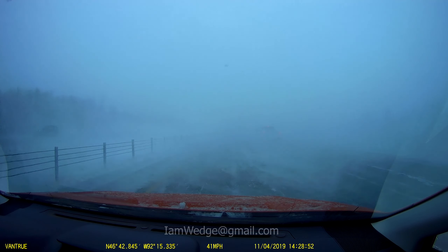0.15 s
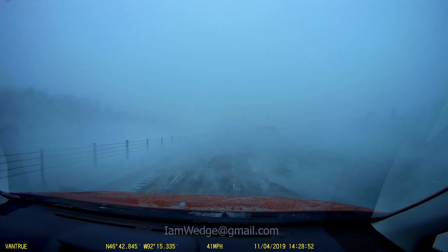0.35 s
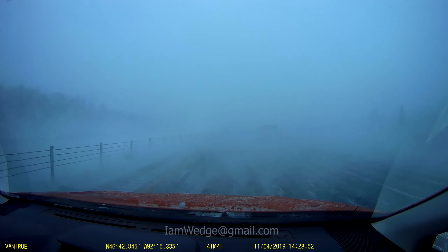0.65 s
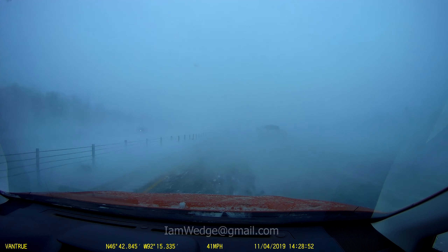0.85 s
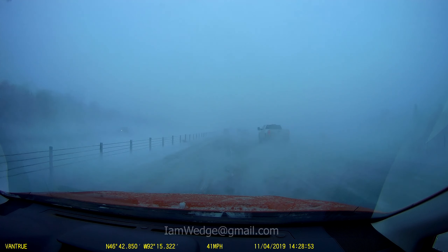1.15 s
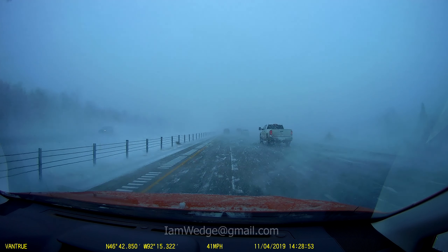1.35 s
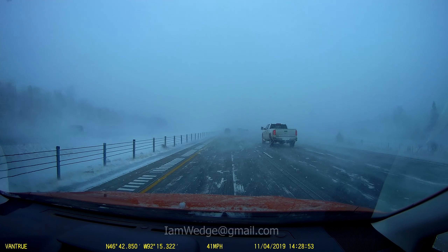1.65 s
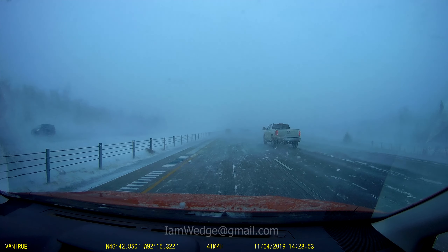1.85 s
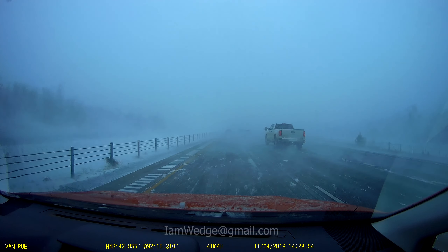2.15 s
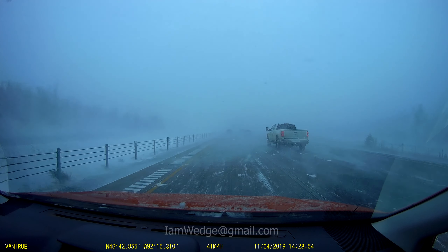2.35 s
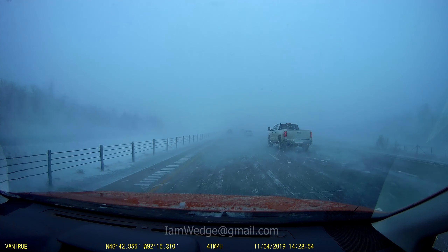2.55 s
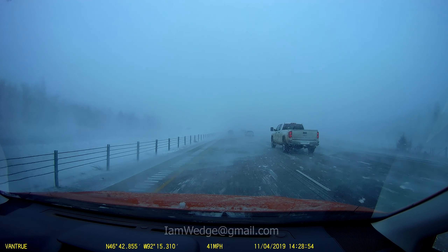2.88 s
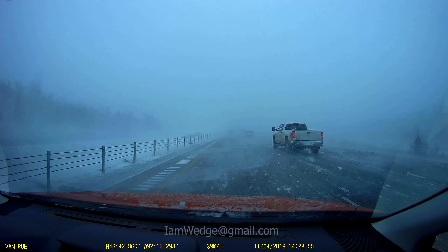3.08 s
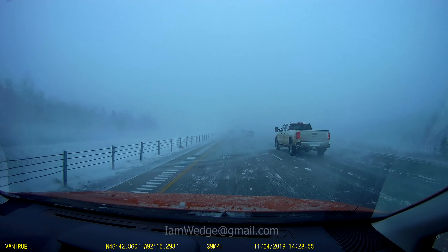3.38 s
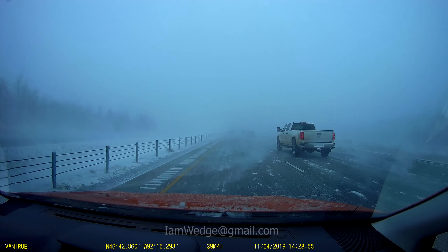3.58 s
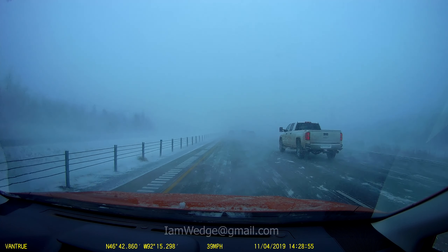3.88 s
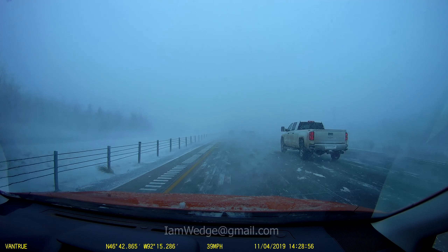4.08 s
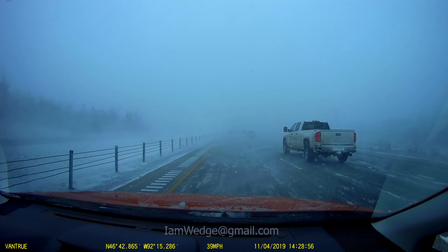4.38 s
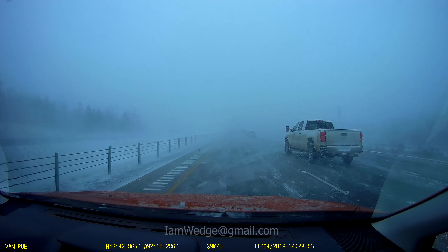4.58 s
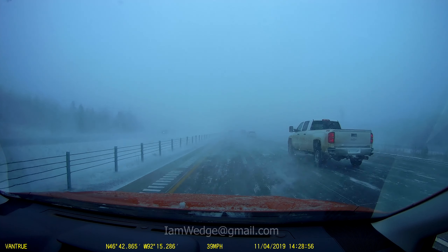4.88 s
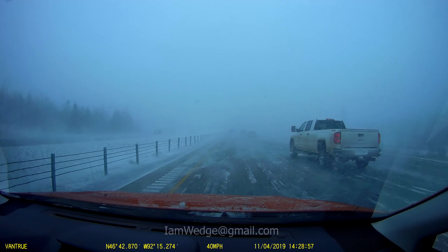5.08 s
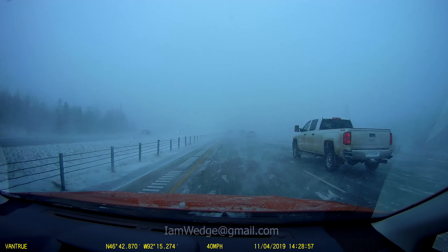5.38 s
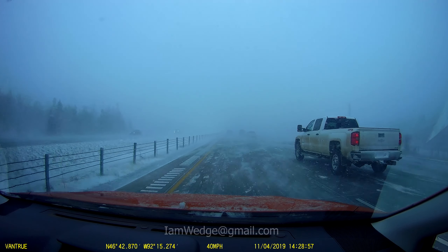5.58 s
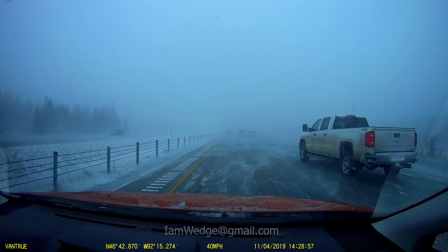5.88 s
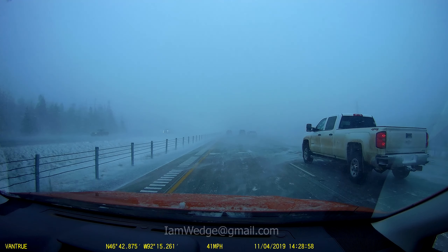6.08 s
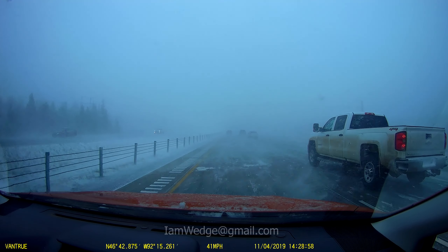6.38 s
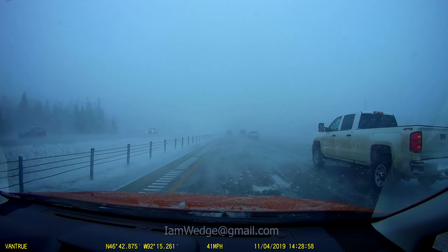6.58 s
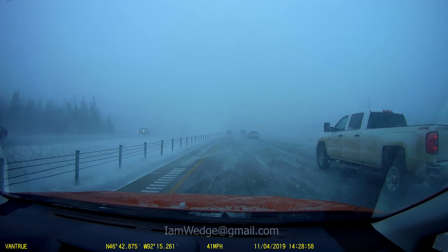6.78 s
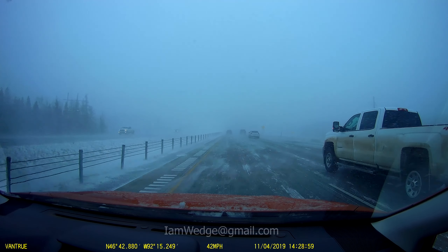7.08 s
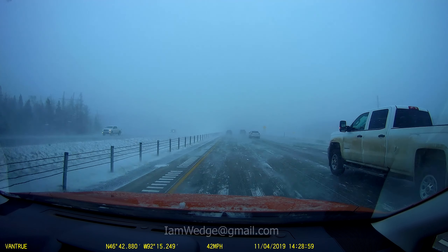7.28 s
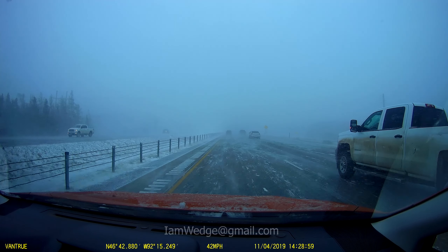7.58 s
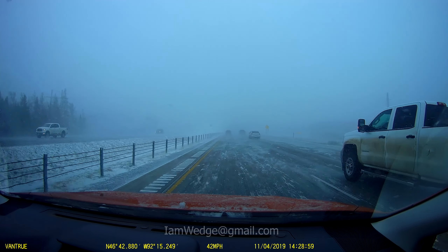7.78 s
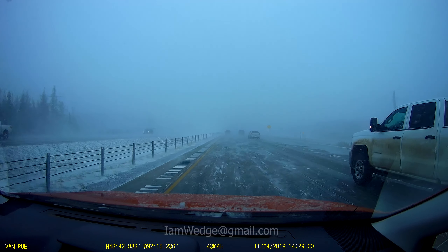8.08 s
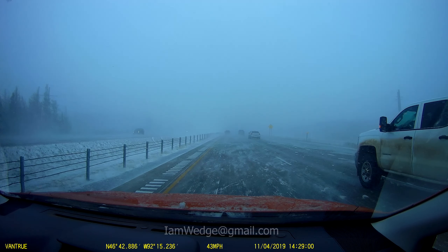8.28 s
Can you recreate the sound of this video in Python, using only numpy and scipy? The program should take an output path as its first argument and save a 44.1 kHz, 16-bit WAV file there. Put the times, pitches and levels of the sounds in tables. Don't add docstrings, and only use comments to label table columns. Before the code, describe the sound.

Inside a car driving a snowy highway in a storm, wind pours through a slightly open window, roaring and fluttering, with low cabin booms and shuddering panels. Tyres drone below. A hazard relay alternates sharp tick and softer tock about three times a second. Early gusts are strongest, bringing brief thin whistles and dull seal cracks; later the wind eases somewhat. One small windscreen microphone hears it close and boxy, with slightly patchy treble.

```python
import sys
import numpy as np
from scipy import signal
from scipy.fft import rfft, irfft, next_fast_len
from scipy.io import wavfile
from scipy.ndimage import uniform_filter1d, minimum_filter1d, map_coordinates

SR = 44100
rng = np.random.default_rng(int(sys.argv[2]) if len(sys.argv) > 2 else 0)


def ratio(d):
    e = np.asarray(d, float) / 20
    return 10 ** e


def master(y):
    cut = np.clip(np.atleast_2d(y).T, -1, 1)
    pcm = np.round(cut * 32767)
    wavfile.write(sys.argv[1], SR, pcm.astype(np.int16))


N = 372204

# (frequency [Hz], density [dB per Hz])
BUFFET_SPECTRUM = [(8, -26), (22, -5.5), (32, -4.5), (48, -8.5), (70, -3), (95, -9.5), (140, -20.5),
                   (300, -73)]
ROAR_SPECTRUM = [(110, -45), (200, -18), (270, -16), (320, -6), (400, -7), (600, -10.5), (800, -25.5),
                 (1200, -62), (3000, -90)]
RUSH_SPECTRUM = [(300, -39), (550, -13), (800, 0.5), (1100, -3.5), (1500, -8.5), (2000, -10), (2500, -19),
                 (3500, -38), (7000, -70)]
HISS_SPECTRUM = [(1200, -38), (2000, -4), (2700, -1.5), (3500, -3), (5000, -8.5), (7000, -11.5),
                 (10000, -15), (13000, -17), (15700, -22)]
# (time [s], level [dB])
WIND_STRENGTH = [(0, -35), (.17, -35), (.37, -31.5), (.63, -36.5), (.8, -33), (1.13, -34.5), (1.38, -26.5),
                 (1.6, -30.5), (2.16, -36), (2.4, -34), (3.1, -37.5), (3.75, -39), (4.1, -36.5), (5.3, -40),
                 (6.45, -39), (6.85, -38), (7.3, -35), (7.8, -40.5)]
# (time [s], level [dB], length [s], brightness [dB])
PUFFS = [(0.186, -3, .06, -2), (0.236, 0.5, 0.035, 3), (0.502, 5, 0.095, 2.5), (0.805, 2, 0.056, -0.5),
         (0.92, 4, 0.037, 0), (1.324, 3.5, 0.051, 1), (1.446, 4, 0.037, -1.5), (1.697, 1.5, .05, 2.5),
         (2.27, 4.5, 0.14, 2), (2.47, -0.5, .05, 3.5), (2.8, 0.7, 0.53, 1.5), (2.982, 0.5, 0.054, 1.5),
         (3.117, -2, 0.1, -1), (3.358, 4.5, 0.1, 1), (3.535, 2.5, 0.1, 1.5), (3.878, 3, 0.13, 2),
         (4.275, 2.5, 0.11, 2), (4.6, -0.5, 0.17, 2.5), (4.86, 0, 0.19, -0.5), (5.082, 1.5, 0.11, 1.5),
         (5.26, 0, 0.12, -3), (5.506, 3.5, 0.06, 0), (5.81, 1.5, 0.089, 2), (6.09, 2, 0.34, 1),
         (6.604, -0.5, 0.042, 1.5), (6.816, 3.5, 0.23, 1), (7.01, 0, .08, -0.5), (7.33, 1.5, 0.068, -1.5),
         (7.45, -1, 0.18, -2.5), (7.87, 2, .06, 0.5), (0.052, -1, .08, 1.5), (0.305, 2, 0.052, 1.5),
         (.38, 3.5, 0.056, 1), (.13, 0, .06, 1), (0.735, -0.5, .06, -1.5), (1.1, 0.5, .1, 0.5),
         (1.968, 0, 0.053, -0.5), (0.662, 1.5, .08, 1), (1.02, 0, .05, 1), (1.25, 0, .05, 0),
         (2.05, -0.5, 0.075, 1.5), (3.22, 1.5, .06, 0.5), (4.52, 2, .08, -2), (5.707, 1, 0.055, 3.5),
         (6.303, -1.5, 0.14, -1), (6.722, -1, .05, 3.5), (7.6, 2.5, 0.12, -1), (8.1, 1.5, .08, -0.5),
         (8.298, 1, .08, 0)]
# (time [s], level [dB], length [s])
THUMPS = [(.02, 1, .1), (.16, -3, .05), (.33, 2.5, .08), (.52, 0, .05), (.87, -3, .05), (1.08, -3, 0.073),
          (1.2, 1, .1), (1.38, -11, .05), (1.45, 4, 0.11), (1.63, 5.5, 0.079), (1.93, 4, 0.062),
          (2.21, -1, .15), (2.72, -8, .05), (3.1, -13, 0.045), (3.15, 3, .04), (3.36, 3, 0.054),
          (3.48, 4.5, 0.11), (3.86, 4.5, .12), (4.25, 7.5, 0.054), (5.1, -5, 0.045), (5.74, 7, 0.051),
          (5.95, 2.5, .08), (6.3, -3, 0.092), (6.56, 2, 0.087), (6.72, 9.5, 0.086), (6.86, 13, .07),
          (6.94, 8.5, 0.079), (7.26, -6.5, 0.065), (7.62, 0, .08), (8.37, 2, 0.079), (.68, 1.5, .1),
          (2.45, 0, .1), (2.9, 1, .1), (4.55, -3, .1), (4.85, -1, .1), (5.4, 0, .1), (7.85, 2, .08),
          (8.1, 2, .1)]
# (time [s], level [dB], length [s])
SLAPS = [(.3, 8, 0.053), (.47, 7.5, 0.16), (.8, 5, 0.21), (.96, 3, 0.12), (1.08, 4, 0.14), (1.31, 3, .08),
         (1.59, -1.5, 0.05), (1.66, 3, 0.05), (1.83, 3.5, 0.041), (2.07, 3.5, 0.082), (2.21, 6, 0.073),
         (3.1, -2, 0.045), (3.26, 4.5, 0.025), (3.36, 1.5, .05), (3.86, 1.5, .1), (4.18, 4, 0.032),
         (4.25, 4, 0.024), (5.1, 6.5, 0.076), (5.22, -3, 0.067), (5.57, 1.5, 0.24), (5.74, 3.5, 0.043),
         (5.81, 6.5, 0.043), (6.04, 3, 0.057), (6.56, 1, 0.18), (6.72, 5, 0.084), (6.88, 5, 0.22),
         (7.26, 3.5, 0.26), (7.62, 4, 0.093), (7.87, 5.5, .04), (.04, 1.5, 0.11), (.14, -1.5, .06),
         (.6, 1.5, 0.14), (1.95, 1.5, .1), (.7, -2, 0.065), (1.2, 1.5, 0.076), (1.44, 2, 0.091),
         (2.38, 2.5, .08), (2.53, 1.5, .08), (2.66, -7, 0.056), (2.95, 1, .12), (3.55, 2.5, 0.087),
         (3.72, -1.5, 0.21), (4.45, -1.5, 0.14), (4.65, 1.5, .08), (4.85, 2, 0.073), (5.42, 0.5, .06),
         (5.92, 3.5, 0.076), (6.32, -0.5, .08), (6.43, 0.5, .06), (7.05, -2, .08), (7.45, 0, .08),
         (7.75, 2, 0.11), (8.1, -1, .08), (8.35, 3, 0.1)]
# (frequency [Hz], width [Hz], boost or dip [dB])
CABIN_MODES = [(122, 24, 3.5), (162.4, 26, 4.5), (254.4, 24, 4), (300, 15, 0), (354.4, 32, 3.5),
               (380, 28, 4.5), (454, 31, -4.5), (556, 50, 5), (695, 64, 5.5), (791, 30, -5.5),
               (845, 18, 2.5), (892, 20, -4.5), (954, 47, 3.5), (1068, 34, 5.5), (1311, 16.5, -6.5),
               (1336, 64, 5.5), (1525, 13, 5), (1930, 140, 1.5), (2115, 38, -3.5), (2310, 35, 1.5),
               (2766, 44, 4.5), (3070, 78, 4.5), (3300, 50, 0), (4750, 48, 4), (5290, 13, 7.5),
               (5700, 24, 3), (6120, 35, 3.5)]
# (time [s], peak level [dB], length [s], pitch [Hz])
CHIRPS = [(.21, -44, .03, 3050), (.36, -44, .08, 3050), (.5, -41, .05, 2750), (.93, -45, .04, 3050),
          (1.22, -44, .03, 3050), (1.37, -41, .1, 3050), (1.4, -41, .05, 2750), (1.55, -46, .12, 3050),
          (1.7, -43, .06, 3050), (1.9, -47, .08, 3050), (2.26, -41, .03, 3030), (2.46, -42, .04, 2990),
          (2.53, -44, .03, 3050), (2.68, -43, .07, 2760), (2.83, -45, .05, 3050), (2.98, -46, .04, 3030),
          (3.4, -47, .04, 2800), (3.55, -45, .03, 3050), (3.85, -46, .04, 3030), (3.9, -47, .04, 2800),
          (4.27, -45, .06, 3050), (4.27, -46, .04, 2800), (4.56, -46, .05, 3020), (5.07, -47, .05, 2800),
          (5.57, -49, .06, 3050), (5.8, -48, .04, 3100)]
# (time [s], peak level [dB])
SEAL_CRACKS = [
    (1.008, -27),
    (1.653, -17),
    (1.696, -17),
    (2.24, -20),
    (3.606, -27),
]
# (frequency [Hz], density [dB per Hz])
PANEL_SPECTRUM = [(100, -56), (160, -8), (200, -3), (260, -0.5), (310, -8), (400, -29.5), (700, -61)]
# (time [s], level [dB], length [s])
PANEL_SWELLS = [(.05, 2.5, .1), (.29, 6, 0.088), (.47, 6, 0.22), (.65, 2, .1), (.8, 6.5, 0.11),
                (.92, 6.5, 0.096), (1.0, 1, 0.086), (1.12, 6.5, 0.097), (1.31, 4.5, .08), (1.44, 3, .08),
                (1.56, -2, 0.096), (1.68, 5.5, 0.064), (1.83, 2.5, .06), (2.05, 4, 0.058), (2.25, 6, 0.08),
                (2.39, 8.5, 0.05), (2.55, 0, .07), (2.7, -1.5, .1), (2.8, -6, 0.046), (2.95, 1, .08),
                (3.11, -6, 0.053), (3.3, 2, 0.14), (3.5, -2.5, .1), (3.7, -1.5, .1), (3.88, 2, 0.13),
                (4.12, -3.5, .08), (4.25, 6.5, 0.047), (4.4, 4, 0.072), (4.6, -4, 0.25), (4.82, -0.5, .1),
                (5.08, 1, 0.073), (5.18, -4, 0.065), (5.33, -1, .07), (5.55, 4, 0.17), (5.76, 5, 0.2),
                (5.9, 2, 0.078), (6.05, 6.5, 0.055), (6.3, -2, 0.11), (6.56, 2.5, 0.068), (6.72, 3, 0.065),
                (6.88, 6, 0.22), (7.05, 5, 0.13), (7.26, 4, .12), (7.45, 2, 0.07), (7.58, -1.5, .08),
                (7.72, 1, .08), (7.9, 4.5, 0.089), (8.1, -2, .08), (8.25, 3, .07), (8.4, -1, 0.079)]
# (frequency [Hz], density [dB per Hz])
DRONE_SPECTRUM = [(45, -41), (85, -17), (120, 0.5), (170, 1), (210, -7.5), (280, -44), (500, -60)]
# (time [s], level [dB], length [s])
RIDGES = [(.14, 2, .06), (.26, -1, .06), (.47, 6, .1), (.8, -5, .05), (.87, -10, .04), (.92, 6, 0.064),
          (1.06, -6, .04), (1.31, 4, 0.055), (1.48, 2, 0.064), (1.57, -12, 0.066), (1.66, 3, 0.17),
          (2.3, 2, 0.062), (2.56, -7.5, 0.026), (2.8, 4, .04), (3.06, 8, 0.047), (3.1, -10, 0.039),
          (3.26, 7, 0.084), (3.58, 5.5, 0.097), (3.95, 4, 0.13), (4.11, 5.5, .07), (4.47, -14, 0.055),
          (5.08, 4, 0.068), (5.33, 4.5, 0.066), (5.5, -6, .08), (5.74, 10, 0.043), (6.13, 9, 0.057),
          (6.72, -3, .06), (6.89, 7, 0.12), (7.06, 6, 0.054), (7.17, 2, 0.045), (.36, 2.5, .08),
          (.62, -1, .08), (1.2, 1, .08), (1.9, 2.5, .1), (2.1, -5, .08), (2.68, 4.5, 0.066),
          (3.75, -2.5, .08), (4.7, 3, 0.11), (5.92, -1, .08), (6.4, -4.5, .1), (7.4, -6.5, .1),
          (7.7, 1.5, .1), (7.95, -5, .08), (8.2, -4, .1)]
# (frequency [Hz], closing level [dB], opening level [dB], t60 [s])
RELAY_MODES = [(2900, -44, -41, .012), (3100, -49, -46, .008), (3370, -36, -44, .02),
               (3520, -46, -43, .008), (6460, -55, -49, .017), (8700, -59, -48, .018),
               (9380, -52, -56, .022), (10200, -66, -62, .008), (11600, -53, -64, .008),
               (12750, -47, -63, .005), (13500, -51, -70, .005), (14800, -58, -72, .004)]
# (delay [s], level [dB])
CLICK_PATHS = [
    (0, 3),
    (.0047, -7),
    (.0072, -7),
    (.0092, -7),
    (0.013, -8),
]
# (frequency [Hz], density [dB per Hz])
SCATTER_SPECTRUM = [(1500, -30), (2700, -5), (3400, 0), (4500, -18), (9000, -15), (10800, -12), (12600, -6),
                    (15700, -14)]
# (frequency [Hz], density [dB per Hz])
AIR_SPECTRUM = [(1000, -13), (3000, 6.5), (6000, -8.5), (10000, -9.5), (13000, -22), (15700, -14)]
# (frequency [Hz], relative level [dB])
DROPOUT_LIMIT = [(4000, -40), (6000, -6.8), (8000, -4.8), (11000, -3.7), (13000, -2.5), (15000, -1.7),
                 (15400, -.6), (15750, .8)]

CALM_DB = -37
# (level in calm wind [dB], gain per wind [dB per dB], chance swing [dB])
BUFFET_LAW, ROAR_LAW = (-31.5, 0.23, 0.77), (-32.5, 0.7, 0.51)
RUSH_LAW, HISS_LAW = (-36.5, 0.86, 0.36), (-47.5, 0.96, 0.21)
WHISTLE_LAW, PANEL_LAW, DRONE_LAW = (-65, 1.3, 1.5), (-33.5, 0.54, 1), (-33, 0.82, 0.94)
SEAL_HZ, SEAL_T60_S = 616, 0.014
FIRST_CLOSE_S, BLINK_S, LIT_S = .5677, .68430, .3418
TOP_HZ = 15720


def unit(x):
    return x / np.sqrt(np.mean(x ** 2) + 1e-20)


def along(points, hz):
    point_hz, value = np.transpose(points)
    return np.interp(np.log(hz + 1), np.log(point_hz + 1), value)


def wobble(rate_hz):
    steps = np.arange(0, N + 16, 16)
    knots = rng.standard_normal(int(N * 60 / SR) + 4)
    curve = map_coordinates(knots, [steps * min(rate_hz, 60) / SR])
    return np.interp(np.arange(N), steps, curve)


def filtered(x, response):
    size = next_fast_len(N + 8192)
    hz = np.fft.rfftfreq(size, 1 / SR)
    return irfft(rfft(x, size) * response(hz), size)[:N]


def swells(rows):
    t = np.arange(0, N + 64, 64) / SR
    at_s, db, length_s = np.transpose(rows)[..., None]
    bells_db = db * np.exp(-(2 * (t - at_s) / length_s) ** 2)
    return np.interp(np.arange(N) / SR, t, np.sum(bells_db, axis=0))


def puff_swells():
    return swells([(s, db, length_s) for s, db, length_s, _ in PUFFS])


def level(law, events_db):
    calm_db, growth, swing_db = law
    wind_s, strength_db = np.transpose(WIND_STRENGTH)
    wind_db = np.interp(np.arange(N) / SR, wind_s, strength_db)
    return ratio(calm_db + growth * (wind_db - CALM_DB) + swing_db * wobble(16) + events_db)


def evened(x, span_s, share):
    size = round(span_s * SR)
    power = np.abs(uniform_filter1d(uniform_filter1d(x ** 2, size), size))
    return unit(x / (power + 1e-3) ** (np.clip(share, 0, 1) / 2))


def cabin(hz):
    coarse_hz = hz[::16]
    gain_db = sum(db / (1 + ((coarse_hz - centre_hz) / width_hz) ** 2)
                  for centre_hz, width_hz, db in CABIN_MODES)
    return ratio(np.interp(hz, coarse_hz, gain_db))


def flow(spectrum, patchy_db):
    z = signal.stft(rng.standard_normal(N), nperseg=512)[2]
    patches = uniform_filter1d(uniform_filter1d(rng.standard_normal(z.shape), 6, 0), 10, 1)
    noise = signal.istft(z * ratio(patchy_db * unit(patches)), nperseg=512)[1][:N]
    return unit(filtered(noise, lambda hz: ratio(along(spectrum, hz)) * cabin(hz)))


def boom(centre_hz, drift_hz):
    pitch_hz = centre_hz + drift_hz * wobble(15)
    return np.sqrt(2) * np.sin(2 * np.pi * np.cumsum(pitch_hz) / SR)


def wind():
    thumps_db, slaps_db, puffs_db = swells(THUMPS), swells(SLAPS), puff_swells()
    brightness_db = swells([(s, bright_db, length_s) for s, _, length_s, bright_db in PUFFS])
    eddy, flutter = wobble(18), wobble(35)

    buffet = flow(BUFFET_SPECTRUM, patchy_db=0.0) + ratio(-5) * boom(centre_hz=46.05, drift_hz=6.1)
    buffet = evened(buffet, span_s=0.025, share=1.0)
    roar = evened(flow(ROAR_SPECTRUM, patchy_db=0.2), span_s=0.13, share=0.96)
    roar = unit(ratio(0.15 * eddy + 0.27 * flutter) * roar)
    rush = unit(ratio(0.1 * wobble(21) + .5 * flutter) * flow(RUSH_SPECTRUM, patchy_db=0.42))
    hiss = unit(ratio(0.36 * eddy + 0.61 * flutter) * flow(HISS_SPECTRUM, patchy_db=0.44))

    low = level(BUFFET_LAW, thumps_db) * buffet + level(ROAR_LAW, slaps_db + 0.29 * puffs_db) * roar
    high = level(RUSH_LAW, puffs_db + 0.076 * slaps_db) * rush
    return low + high + level(HISS_LAW, 0.54 * puffs_db + brightness_db) * hiss


def whistle():
    pitch_hz = 3060 + 45 * wobble(5.5) + 35 * wobble(50)
    phase = 2 * np.pi * np.cumsum(pitch_hz) / SR
    noise = rng.standard_normal((2, N))
    breath = unit(uniform_filter1d(uniform_filter1d(noise, 150), 150))
    tone = breath[0] * np.cos(phase) + breath[1] * np.sin(phase)
    return level(WHISTLE_LAW, 0.54 * puff_swells()) * tone


def chirps():
    out = np.zeros(N + SR)
    drift = 2 * np.pi * np.cumsum(60 * wobble(60)) / SR
    for s, db, length_s, hz in CHIRPS:
        at = np.arange(round((s - 1.5 * length_s) * SR), round((s + 1.5 * length_s) * SR))
        bell = np.exp(-(2 * (at / SR - s) / length_s) ** 2)
        out[at] += ratio(db) * bell * np.sin(2 * np.pi * hz * at / SR + drift[at])
    return out[:N]


def seal_cracks():
    out, t = np.zeros(N), np.arange(SR // 40) / SR
    for s, db in SEAL_CRACKS:
        crack = ratio(db - 60 * t / SEAL_T60_S) * np.sin(2 * np.pi * SEAL_HZ * t) * 2
        out[round(s * SR):][:len(t)] += crack
    return out


def panels():
    rumble = evened(flow(PANEL_SPECTRUM, patchy_db=1.0), span_s=0.059, share=0.96)
    return level(PANEL_LAW, swells(PANEL_SWELLS)) * rumble


def tyres():
    drone = evened(flow(DRONE_SPECTRUM, patchy_db=1.0), span_s=0.047, share=1.0)
    return level(DRONE_LAW, swells(RIDGES)) * drone


def relay_click(closing, scatter, attack_s, tail_db, crack_db):
    t = np.arange(SR // 10) / SR
    click = (ratio(tail_db - 60 * t / .09) + ratio(crack_db - 60 * t / .03)) * (1 - np.exp(-t / .0008))
    click *= unit(scatter[closing * SR:][:len(t)])
    for delay_s, path_db in CLICK_PATHS:
        late_s = np.maximum(t - delay_s, 0)
        for hz, close_db, open_db, t60_s in RELAY_MODES:
            mode_db = (close_db if closing else open_db) + path_db
            ring = ratio(mode_db - 60 * late_s / t60_s) * np.sin(2 * np.pi * hz * late_s)
            click += ring * (1 - np.exp(-late_s / attack_s))
    return click


def relay():
    out = np.zeros(N + SR)
    scatter = flow(SCATTER_SPECTRUM, patchy_db=0)
    tick = relay_click(True, scatter, attack_s=.0007, tail_db=-46.5, crack_db=-49)
    tock = relay_click(False, scatter, attack_s=.002, tail_db=-55, crack_db=-60)
    for click, start_s in ((tick, 0), (tock, LIT_S - BLINK_S)):
        for beat in range(13):
            at = round((FIRST_CLOSE_S + start_s + beat * BLINK_S) * SR)
            out[at:][:len(click)] += ratio(rng.normal(0, .3)) * click
    return out[:N]


def heater_air():
    return ratio(-55.5) * flow(AIR_SPECTRUM, patchy_db=-1.0)


def scene():
    window = wind() + whistle() + chirps() + seal_cracks()
    return (window + panels() + tyres() + relay() + heater_air())[None]


def treble_dropouts(x, uneven_db):
    hz, _, z = signal.stft(x, SR, nperseg=2048)
    patch = uniform_filter1d(np.abs(z) ** 2, 11, -2)
    around = uniform_filter1d(patch, 70, -2)
    around = around ** .76 * np.median(around, -1, keepdims=True) ** .24
    floor = minimum_filter1d(uniform_filter1d(around, 3, -1), 5, -1)
    around = np.minimum(around, 1.1 * uniform_filter1d(floor, 5, -1))
    limit_db = along(DROPOUT_LIMIT, hz)[:, None] + uneven_db * rng.standard_normal(z.shape[-1])
    gain = np.where(patch < ratio(limit_db) ** 2 * around, .03, 1)
    return signal.istft(z * gain, SR, nperseg=2048)[1][..., :N]


def band_limit(x):
    return signal.sosfilt(signal.butter(12, 15690, fs=SR, output="sos"), x)


def record(dry):
    limited = filtered(dry[0], lambda hz: hz < TOP_HZ)[None]
    mix = treble_dropouts(limited, uneven_db=.9)
    return band_limit(mix)


dry = scene()
out = record(dry)
master(out)
```